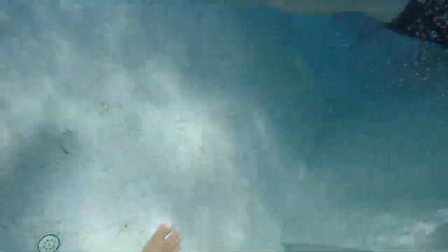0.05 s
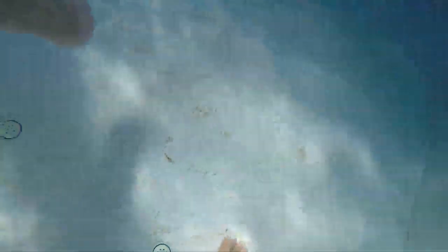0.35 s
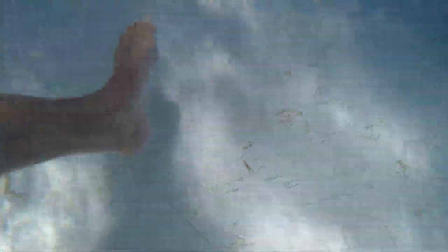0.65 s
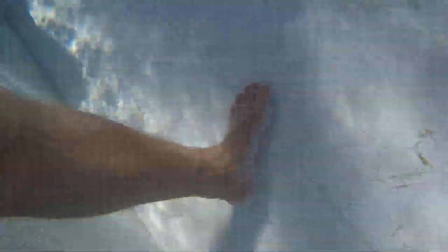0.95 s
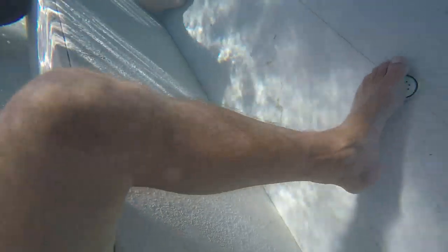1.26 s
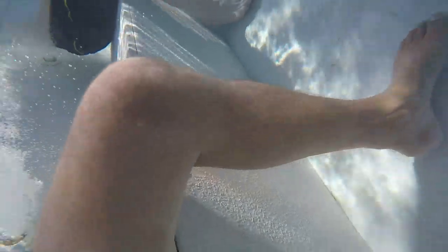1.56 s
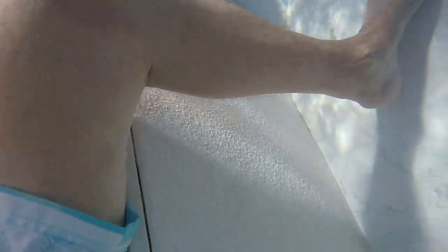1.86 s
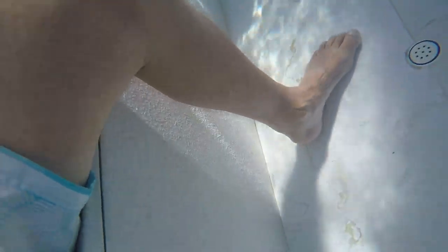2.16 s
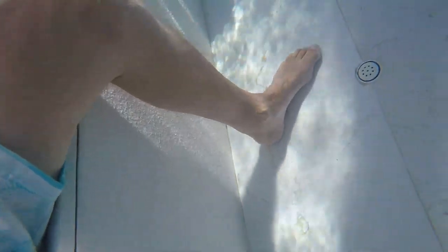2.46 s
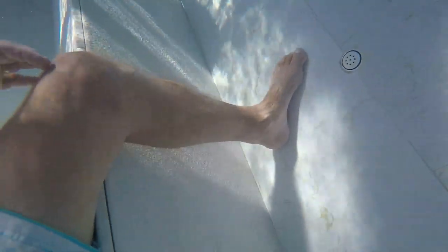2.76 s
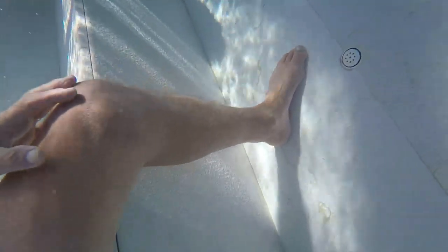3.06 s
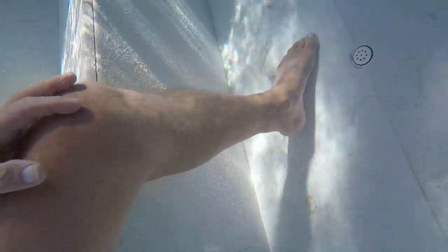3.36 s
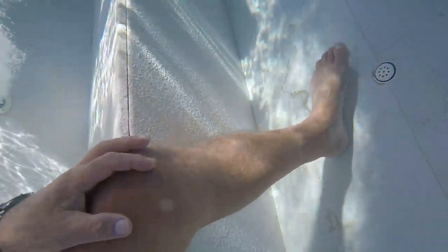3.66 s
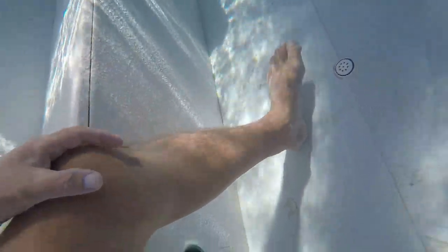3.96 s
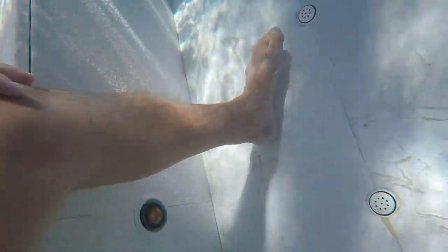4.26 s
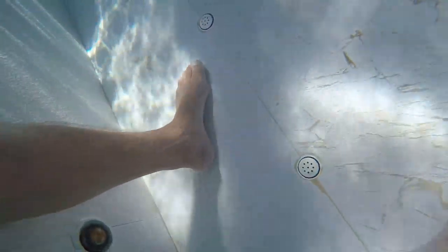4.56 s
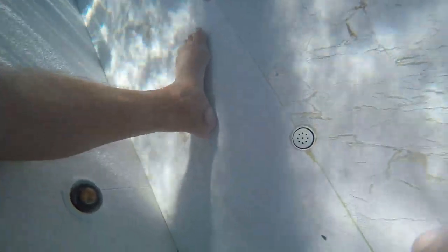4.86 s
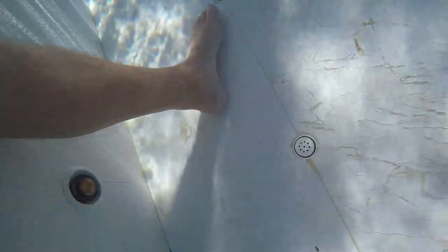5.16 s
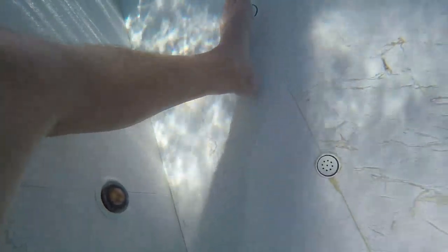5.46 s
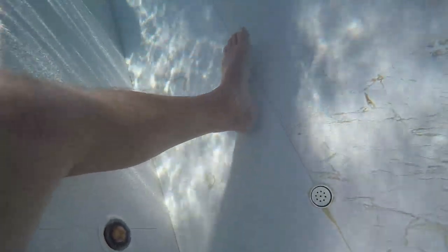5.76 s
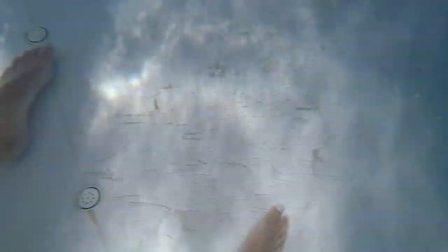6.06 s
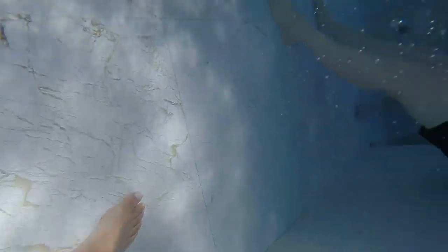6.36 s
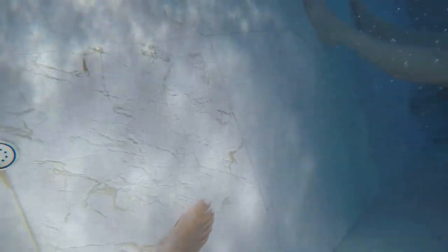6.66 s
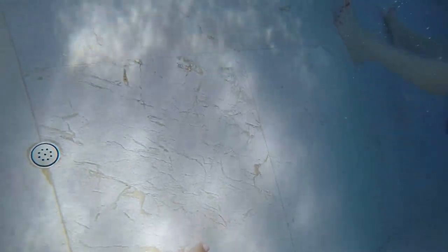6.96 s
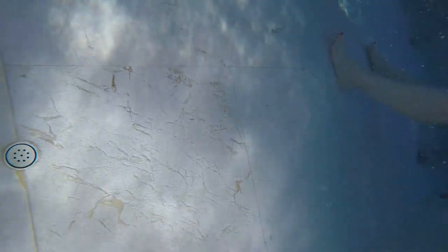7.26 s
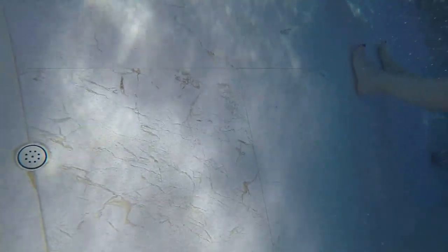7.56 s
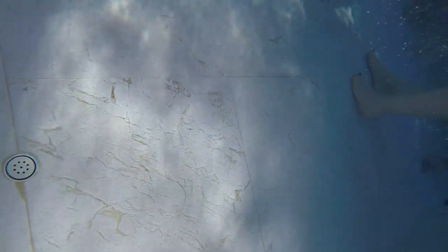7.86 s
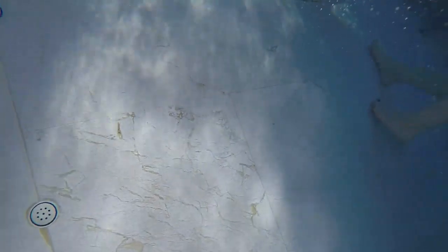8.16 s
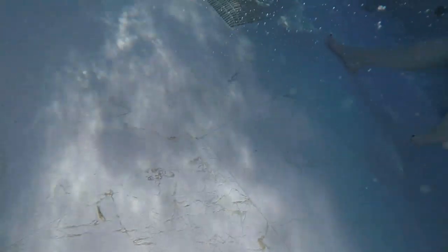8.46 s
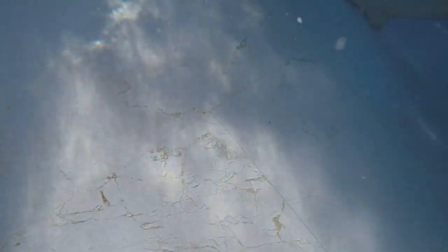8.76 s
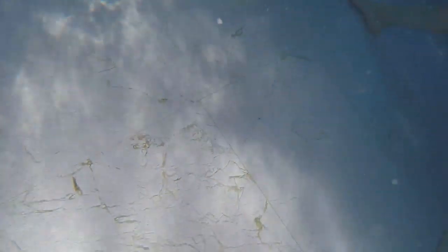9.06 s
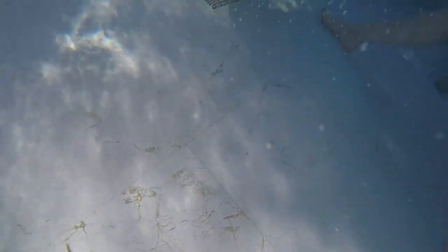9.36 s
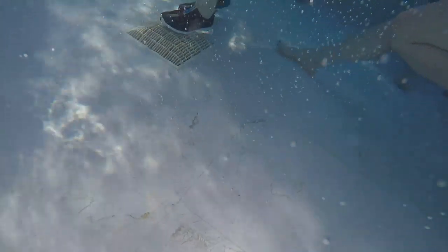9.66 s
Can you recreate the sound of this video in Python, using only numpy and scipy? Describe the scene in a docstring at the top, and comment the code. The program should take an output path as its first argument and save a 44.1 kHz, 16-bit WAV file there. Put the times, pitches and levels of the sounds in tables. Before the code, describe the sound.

Underwater in a hot tub, churning jets and a humming pump carry on as bubbles plink and fingers tap and bump a waterproof case.

```python
"""Under water in a hot tub, heard from a camera in a waterproof housing. Churning jets, pump hum and fizz
swell up while single bubbles plink close by. After a second, fingers click on the housing, a new grip
recolours the fizz and a splashy wash slips between bubble pops; scattered taps and rubs follow.
Past six seconds the grip shifts again and soft bumps push on the case: the hardest ducks the gain
for about half a second. Lighter bumps come near the end."""
import sys
import numpy as np
from scipy import signal
from scipy.fft import rfft, irfft, next_fast_len
from scipy.io import wavfile
from scipy.ndimage import uniform_filter1d, minimum_filter1d, map_coordinates

SR = 44100
rng = np.random.default_rng(int(sys.argv[2]) if len(sys.argv) > 2 else 0)


def unload_audio(sound):
    """Save the sound as a 16-bit wav file, at the path given as the first command line argument."""
    columns = np.transpose(np.atleast_2d(sound))
    # keep every value between -1 and 1, then stretch to whole-number steps
    steps = np.round(np.clip(columns, -1, 1) * 32767)
    wavfile.write(sys.argv[1], SR, steps.astype(np.int16))


N = 432621
T = np.arange(N) / SR


def amp(db):
    """Decibels to gain."""
    return 10 ** (np.asarray(db) / 20)


def unit(x):
    """The same sound at rms 1."""
    return x / np.sqrt(np.mean(x ** 2) + 1e-20)


def fader(points):
    """A level ride through (time_s, level_db) points, in dB per sample."""
    return np.interp(T, *np.transpose(points))


def wobble(rate_hz):
    """A smooth random curve, rate_hz knots a second."""
    return map_coordinates(rng.standard_normal(int(N * rate_hz / SR) + 4), [T * rate_hz])


def filtered(x, response):
    """x through an EQ whose gain is response(hz)."""
    size = next_fast_len(N + 8192)
    return irfft(rfft(x, size) * response(np.fft.rfftfreq(size, 1 / SR)), size)[:N]


def coloured(x, spectrum):
    """x shaped by (freq_hz, gain_db) points on a log axis, at rms 1."""
    freqs, db = np.transpose(spectrum)
    return unit(filtered(x, lambda hz: amp(np.interp(np.log(hz + 1), np.log(freqs + 1), db))))


def noise(spectrum):
    """Noise of rms 1 with the given spectrum."""
    return coloured(rng.standard_normal(N), spectrum)


def resonate(x, hz, q):
    """x twice through the same resonant band-pass."""
    peak = signal.iirpeak(min(hz, SR / 2.5), max(q, .9), SR)
    return signal.lfilter(*peak, signal.lfilter(*peak, x))


def ring(t, hz, t60):
    """One dying mode."""
    return np.sin(2 * np.pi * hz * t) * amp(-60 * t / t60)


def add(track, start_s, sound):
    """Mix a sound into a track at start_s."""
    part = track[max(round(start_s * SR), 0):][:len(sound)]
    part += sound[:len(part)]


def bubble_cloud(low_hz, high_hz, cycles, spread_db, count, samples):
    """Bubbles born at random: each rings for some cycles and rises in pitch."""
    when, pitch, strength = rng.random((count, 3)).T[:, :, None]
    hz = low_hz * (high_hz / low_hz) ** pitch
    t = np.arange(samples) / SR
    age = t * hz / cycles
    rings = amp(spread_db * strength - 60 * age) * np.sin(2 * np.pi * hz * t * (1 + .1 * age))
    index = (when * N).astype(int) + np.arange(samples)
    return unit(np.bincount(index.ravel(), rings.ravel(), N)[:N])


def drifting(x, depth_db, window, frames):
    """Sound paths through the moving water shift: narrow peaks and dips come and go over some frames."""
    spectra = signal.stft(np.pad(x, window, "reflect", reflect_type="odd"), nperseg=window)[2]
    ripple = uniform_filter1d(rng.standard_normal(spectra.shape), size=5, axis=0)
    ripple = unit(uniform_filter1d(ripple, size=frames, axis=1))
    rippled = signal.istft(spectra * amp(depth_db * ripple), nperseg=window)[1]
    return unit(rippled[window:][:N]) * np.std(x)


# The hum's level at the camera: time_s, level_db
HUM_RIDE = [(0, -29.5), (1.4, -21), (2.9, -23), (4.3, -18.5), (4.9, -30), (7.9, -22), (9.8, -25)]

def pump(pitch_hz=135.3, waver_hz=4, flutter_db=3):
    """The pump's tone wavers on its way through the moving, bubbly water."""
    phase = 2 * np.pi * np.cumsum(pitch_hz + waver_hz * wobble(12)) / SR
    return amp(fader(HUM_RIDE)) * unit(amp(flutter_db * wobble(6.5)) * np.sin(phase))


# Colours of the mist, its fine spray and the sizzle on top: freq_hz, gain_db
MIST_EQ = [(500, -22.5), (850, -3.5), (1100, 0), (2000, 0.5), (3000, -0.5), (3800, -1.5), (4300, -10),
           (5400, -11.5), (6300, -25), (9000, -54)]
SPRAY_EQ = [(4000, -28.5), (6000, 1), (7500, 4), (9500, -2.5), (10700, -6), (11600, -4.5), (12400, -11.5),
            (15400, -25)]
SIZZLE_EQ = [(10000, -40), (12500, -7.5), (13700, 0), (14800, -2.5), (15400, -15.5)]
# Their rides; the spray grows as the camera turns to the jets: time_s, level_db
MIST_RIDE = [(0, -42.5), (4.5, -41.5), (6.0, -42.5), (6.8, -41.5), (8.0, -41), (9.3, -41), (9.8, -45)]
SPRAY_RIDE = [(0, -63), (1.2, -62), (2.2, -66), (3.3, -64.5), (4.5, -61.5), (5.6, -61), (5.87, -57),
              (6.1, -61), (6.55, -57), (7.0, -59.5), (8.0, -59), (9.0, -59), (9.8, -61.5)]
SIZZLE_RIDE = [(0, -74), (1.3, -68), (2.0, -71), (3.3, -69.5), (3.85, -66.5), (4.8, -73), (6.2, -72),
               (7.4, -68), (8.0, -62.5), (8.45, -70), (9.8, -69.5)]

def fizz(flicker_db=0.7, grain_db=-9, swirl_db=1.9):
    """A grainy mist of tiny bubbles, with swarms of the finest swirling past."""
    grains = bubble_cloud(1000, 8900, cycles=3.9, spread_db=30.5, count=7000, samples=400)
    mist = amp(fader(MIST_RIDE)) * unit(noise(MIST_EQ) + amp(grain_db) * coloured(grains, MIST_EQ))
    for ride, eq in ((SPRAY_RIDE, SPRAY_EQ), (SIZZLE_RIDE, SIZZLE_EQ)):
        mist += amp(fader(ride) + swirl_db * wobble(9.2)) * noise(eq)
    mist *= amp(flicker_db * wobble(14))
    return drifting(mist, depth_db=1.4, window=1024, frames=16)


# The hand takes a new grip: time_s
GRIP_CHANGES = [1.3, 6.45]
# Peaks and dips of the housing, one list per grip: centre_hz, width_hz, gain_db
GRIP_EQS = [
    [(1520, 570, 9.5), (2010, 190, -5.5), (2600, 150, 1.5), (3010, 300, -4.5), (3720, 130, 3.5),
     (7500, 1200, 4.5)],
    [(795, 80, 15), (1487, 170, 10.5), (2015, 340, 4), (2522, 100, 6.5), (2790, 98, -4), (3140, 350, 0.5),
     (4530, 250, 5.5), (4920, 300, -4.5), (5620, 160, -10), (6730, 200, 4.5), (7000, 250, -6),
     (8100, 500, -5.5), (9600, 900, 5), (12800, 700, -3.5), (13650, 400, 1.5)],
    [(1700, 320, -3), (1835, 50, 9), (2136, 73, 5), (2800, 480, 8.5), (4120, 170, -6.5), (4560, 300, 8.5),
     (5700, 390, 2), (6370, 230, -10), (8030, 2000, 6.5), (12350, 500, -6)],
]

def housing(x, crossfade_s=0.41):
    """The housing's resonances colour x and shift with each new grip."""
    grip = sum(np.clip((T - time_s) / crossfade_s + .5, 0, 1) for time_s in GRIP_CHANGES)
    heard = np.zeros(N)
    for k, bells in enumerate(GRIP_EQS):
        eq = lambda hz: amp(sum(db * .5 ** ((2 * (hz - mid) / width) ** 2) for mid, width, db in bells))
        weight = np.clip(1 - abs(grip - k), 0, 1)
        heard += weight * unit(filtered(x, eq))
    return heard * np.std(x)


# Colours of the largest clouds with the water's sway, and of the smaller clouds: freq_hz, gain_db
RUMBLE_EQ = [(6, -33.5), (16, -10), (40, -15.5), (68, -8), (98, 0.5), (125, -0.5), (150, 1), (185, -11.5),
             (300, -71.5)]
CHURN_EQ = [(70, -52.5), (130, -12), (160, -2), (185, 0.5), (225, -3.5), (255, -5.5), (305, -10),
            (355, -18.5), (430, -23.5), (700, -100)]
# How hard the smaller clouds churn: time_s, level_db
CHURN_RIDE = [(0.3, -13.5), (2.2, -15.4), (2.95, -18.5), (3.35, -16), (4.6, -18.5), (5.35, -17), (5.9, -18),
              (6.5, -19), (6.8, -18), (8.1, -18.5), (9.0, -18), (9.7, -19.5)]

def churn(rumble_db=-19, rise_db_per_s=0.02, swell_db=4, swell_s=0.32, throb_db=0.6):
    """The largest bubble clouds swell in to a near-steady rumble; smaller ones throb above it."""
    swell = np.clip(1 - T / swell_s, 0, 1)
    rumble = amp(rumble_db + rise_db_per_s * T - swell_db * swell) * noise(RUMBLE_EQ)
    return rumble + amp(fader(CHURN_RIDE) + throb_db * wobble(9)) * noise(CHURN_EQ)


# Colour of the gurgling bubbles: freq_hz, gain_db
GURGLE_EQ = [(250, -19), (370, -4), (450, -2.5), (520, 0), (610, -6), (670, -11.5), (750, -19),
             (850, -26.5), (1100, -53.5), (2000, -100)]
# How hard they gurgle: time_s, level_db
GURGLE_RIDE = [(0.2, -30.5), (1.9, -26.5), (3.0, -28.5), (3.9, -30.5), (4.9, -27), (5.35, -27.5),
               (6.0, -28), (7.35, -26.5), (7.8, -29), (8.2, -26), (9.7, -30.5)]

def gurgle(bubble_share=0.37):
    """Single bubbles ring in a wash of noise of the same colour."""
    bubbles = bubble_cloud(340, 720, cycles=33.3, spread_db=7.0, count=1200, samples=2600)
    rings = np.sqrt(bubble_share) * coloured(bubbles, GURGLE_EQ)
    wash = np.sqrt(1 - bubble_share) * noise(GURGLE_EQ)
    return amp(fader(GURGLE_RIDE)) * (rings + wash)


# Colour of the burble: freq_hz, gain_db
BURBLE_EQ = [(300, -40.5), (480, -7.5), (570, 3), (630, -0.5), (690, -7), (770, -22), (900, -36),
             (2000, -100)]
# Its spurts: time_s, level_db
BURBLE_RIDE = [(0.3, -37), (1.8, -30), (2.9, -40), (3.58, -32.5), (3.85, -35.5), (4.02, -28), (4.16, -36.5),
               (4.95, -40), (5.35, -33), (6.1, -30.5), (6.6, -32), (6.9, -33.5), (9.1, -33.5), (9.35, -37),
               (9.75, -31.5)]

def burble():
    """The smallest of the gurgling bubbles come in spurts."""
    bubbles = bubble_cloud(522, 740, cycles=37.3, spread_db=4.5, count=900, samples=2600)
    return amp(fader(BURBLE_RIDE)) * coloured(bubbles, BURBLE_EQ)


# Brief surges of the jets: centre_s, length_s, boost_db
JET_SURGES = [(2.03, 0.33, 1.4), (2.38, 0.28, 1), (3.42, 0.41, 1.5), (4.06, 0.25, 1.3), (4.4, 0.1, 2.5),
              (4.97, 0.25, 1.2), (5.36, 0.21, 2.8), (6.48, 0.34, 1.3), (7.8, 0.39, 1.2), (8.18, 0.2, 1.5)]

def jets():
    """Air-laden jets churn, gurgle and burble, surging together through the moving water."""
    surge_db = sum(boost_db * np.cos(np.pi * np.clip((T - centre_s) / length_s, -.5, .5)) ** 2
                   for centre_s, length_s, boost_db in JET_SURGES)
    return amp(surge_db) * drifting(churn() + gurgle() + burble(), depth_db=1.1, window=4096, frames=4)


# Colour of the splash and the rubs: freq_hz, gain_db
ROUGH_EQ = [(500, -23), (850, 2.5), (1200, -1.5), (1700, -6), (2500, -1.5), (3300, -24), (6000, -13),
            (12000, -45)]
# A brief splashy wash between the bubble pops at 1.6 s; the later rows are skin dragging over the case:
# start_s, length_s, level_db, pitch_hz
SPLASH_AND_RUB_CUES = [(1.6, 0.13, -40, 940), (2.724, 0.12, -37, 1190), (2.852, 0.089, -34.5, 1300),
                       (5.997, 0.47, -43.5, 1080), (7.08, 0.1, -37, 2090), (8.104, 0.13, -42.5, 2170)]

def splash_and_rubs(rough_db=3.0, q=2.1, octave_db=-4):
    """Rough noise through a resonance and its octave: first a splashy wash, later finger rubs."""
    out = np.zeros(N)
    rough = amp(rough_db * wobble(130)) * noise(ROUGH_EQ)
    for start_s, length_s, level_db, hz in SPLASH_AND_RUB_CUES:
        burst = rough[int(start_s * SR):][:int(length_s * SR)]
        tuned = unit(resonate(burst, hz, q) + amp(octave_db) * resonate(burst, 2 * hz, q))
        add(out, start_s, amp(level_db) * tuned * np.sqrt(np.hanning(len(burst))))
    return out


# Colour of the tick as a bubble pinches off: freq_hz, gain_db
TICK_EQ = [(300, -27), (800, 3.5), (1400, 4.5), (2500, -1), (3100, -19), (6000, -33), (12000, -50)]
# Single bubbles close to the housing: start_s, ring_db, pitch_hz, tick_db
PLINK_CUES = [(0.092, -23, 1850, -22.5), (0.1136, -19, 1830, -24), (0.133, -22, 1810, -27),
              (0.157, -18, 1780, -26), (0.196, -22.5, 1650, -23), (0.219, -30.5, 1680, -28),
              (0.4728, -27, 1860, -24), (0.5662, -16, 2300, -33), (1.403, -24, 1210, -29),
              (1.464, -11.5, 1214, -14.5), (1.53, -14.5, 1027, -18), (1.611, -26, 1110, -31),
              (1.636, -19, 1540, -18), (1.637, -17, 1100, -27), (1.655, -11.5, 2360, -28),
              (1.657, -22, 1450, -30), (2.669, -27, 1004, -34), (2.698, -29, 1540, -38),
              (4.012, -34, 1420, -26), (4.1134, -34, 1190, -23), (5.1306, -26, 2630, -24.5),
              (6.058, -29, 1200, -38), (6.133, -29, 894, -31), (6.238, -35, 925, -34),
              (6.297, -22.5, 1250, -25)]

def plinks(ring_cycles=53, puff_db=-13, puff_t60=0.041, tick_t60=0.019, attack_s=0.0015):
    """A bubble pinches off with a dry tick and a crackly puff, then rings: the larger, the longer."""
    out, t = np.zeros(N), T[:SR // 8]
    ticks = noise(TICK_EQ)
    onset = 1 - np.exp(-t / attack_s)
    for k, (start_s, ring_db, hz, tick_db) in enumerate(PLINK_CUES):
        tone = ring(t, hz, ring_cycles / hz)
        burst = rng.standard_normal(len(t)) * amp(-60 * t / puff_t60)
        puff = amp(puff_db) * np.std(tone) * unit(resonate(burst, hz, q=1.2))
        tick = ticks[k * len(t):][:len(t)] * amp(tick_db - 60 * t / tick_t60)
        add(out, start_s, (amp(ring_db) * (tone + puff) + tick) * onset)
    return out


# Colour of a plastic snap: freq_hz, gain_db
SNAP_EQ = [(700, -28), (2200, -2), (4000, -2), (5300, -8.5), (7500, -5.5), (8500, -20), (11000, -21),
           (12300, -19.5), (14300, -25), (16000, -27)]
# Finger clicks and taps, levels before trim_db: start_s, body_db, pitch_hz, sharpness_q, crack_db
CLICK_CUES = [(1.163, -26.5, 2980, 1.3, -42.5), (1.403, -45, 12500, 2.3, -58), (1.464, -38, 5570, 7, -50),
              (1.498, -50, 14200, 6, -60), (1.53, -38, 6100, 10, -54), (1.5553, -9, 3400, 3, -21),
              (1.603, -30, 2300, 1.6, -43), (1.61, -51, 13000, 2.5, -60), (1.637, -49, 11500, 2, -54),
              (2.533, -41, 9700, 2.7, -34), (2.7156, -25.5, 1700, 1.5, -54), (3.4535, -22, 3300, 1.2, -23),
              (3.885, -28, 3200, 1.2, -25), (3.931, -21, 1350, 1.2, -39), (4.5195, -27, 1400, 2, -39),
              (6.299, -19, 2360, 3.5, -54), (6.387, -23.5, 2490, 1.5, -34), (6.594, -19, 1650, 1.2, -38),
              (6.856, -28, 1600, 2.1, -52), (8.922, -32, 5260, 3.9, -53.5)]
# Modes of the housing's shell: pitch_hz, gain_db, t60_s
SHELL_MODES = [(2250, -20, .02), (3270, -6, .013), (3630, 0, .017)]

def clicks(trim_db=-18, body_cycles=38, crack_t60=0.0037, attack_s=0.0003, shell_s=1.555, shell_db=-3.5):
    """Plastic snaps: a bright crack and a resonance set by where the finger lands, briefer when high."""
    out, t = np.zeros(N), T[:SR // 20]
    snaps = noise(SNAP_EQ)
    onset = 1 - np.exp(-t / attack_s)
    for k, (start_s, body_db, hz, q, crack_db) in enumerate(CLICK_CUES):
        snap = onset * snaps[k * len(t):][:len(t)]
        body = unit(resonate(snap * amp(-60 * t * hz / body_cycles), hz, q))
        crack = unit(snap * amp(-60 * t / crack_t60))
        add(out, start_s, amp(trim_db) * (amp(body_db) * body + amp(crack_db) * crack))
    shell = sum(amp(gain_db) * ring(t, hz, t60) for hz, gain_db, t60 in SHELL_MODES)
    add(out, shell_s, amp(shell_db) * shell)  # the hardest click rings the shell
    return out


# Soft pushes on the case: start_s, push_db, push_hz, boom_db
BUMP_CUES = [(0.35, -17, 30, -37), (6.21, -11, 22, -47), (6.245, -14, 32, -42), (6.597, 6.5, 57, 6.5),
             (6.859, 1.5, 47, -24), (8.53, -14, 34, -35), (8.6, -12, 22, -40), (8.8, -14, 30, -38),
             (9.29, -17, 31, -39)]

def bumps(boom_hz=135, boom_rise_s=0.013, slosh_db=-29, slosh_hz=620, slosh_t60=0.16):
    """A push flexes the case for about one cycle; a hard one also makes it boom and sloshes the water."""
    out, t = np.zeros(N), T[:SR // 3]
    swell = lambda u: u ** 2 * np.exp(2 * (1 - u))  # peaks at u = 1
    for start_s, push_db, push_hz, boom_db in BUMP_CUES:
        push = amp(push_db) * swell(2 * t * push_hz) * np.sin(2 * np.pi * push_hz * t)
        boom = swell(t / boom_rise_s) * np.sin(2 * np.pi * boom_hz * t)
        water = unit(resonate(rng.standard_normal(len(t)), slosh_hz, q=1.7))
        slosh = amp(slosh_db - 60 * t / slosh_t60) * water
        add(out, start_s, amp(boom_db) * (boom + slosh) - push)
    return out


def scene(swell_db=6, swell_s=0.23):
    """The water bed swells up at first; close bubbles and the hand on the housing sit on top."""
    fade_in = amp(-swell_db * np.clip(1 - T / swell_s, 0, 1))
    bed = fade_in * (jets() + pump() + housing(fizz()))
    return (bed + plinks() + clicks() + splash_and_rubs() + bumps())[None]


def gain_control(x, ceiling=.94, hold_s=0.28, recovery_db_per_s=30, bass_hz=260, treble_share=0.29):
    """Peaks over the ceiling pull the gain down, the bass most; it waits, then climbs back."""
    over_db = lambda level: 20 * np.log10(np.maximum(level / ceiling, 1))
    # a short look-ahead eases the gain down before the peak arrives
    eased = lambda db: uniform_filter1d(minimum_filter1d(amp(-db), size=201), size=201)
    # only peaks that last a millisecond or more are held
    excess_db = over_db(uniform_filter1d(abs(x), size=70))
    span = int(hold_s * SR)
    held_db = -minimum_filter1d(-excess_db, span, origin=(span - 1) // 2)
    cut_db = np.maximum.accumulate(held_db + recovery_db_per_s * T) - recovery_db_per_s * T
    bass = filtered(x, lambda hz: 1 / (1 + (hz / bass_hz) ** 4))
    ducked = bass * eased(cut_db) + (x - bass) * eased(treble_share * cut_db)
    return ducked * eased(over_db(abs(ducked)))  # a fast limiter catches the remaining peaks


def record(dry, top_hz=15300):
    """The camera rides its gain and keeps nothing above its band limit."""
    low_pass = signal.butter(24, top_hz, fs=SR, output="sos")
    return signal.sosfiltfilt(low_pass, gain_control(dry[0]))[None]


dry = scene()
out = record(dry)
unload_audio(out)
```